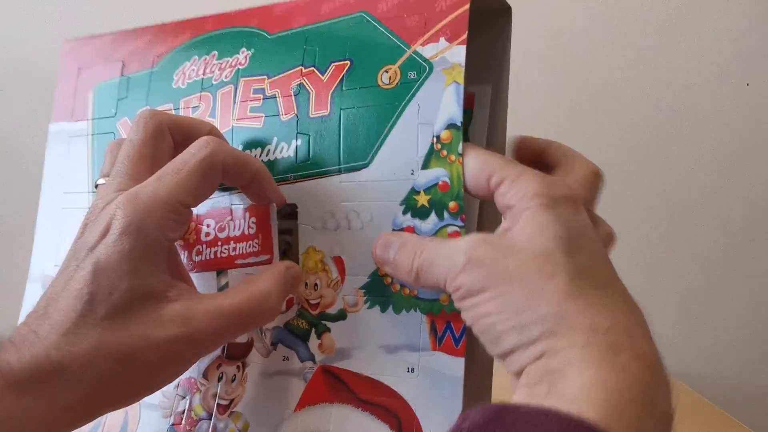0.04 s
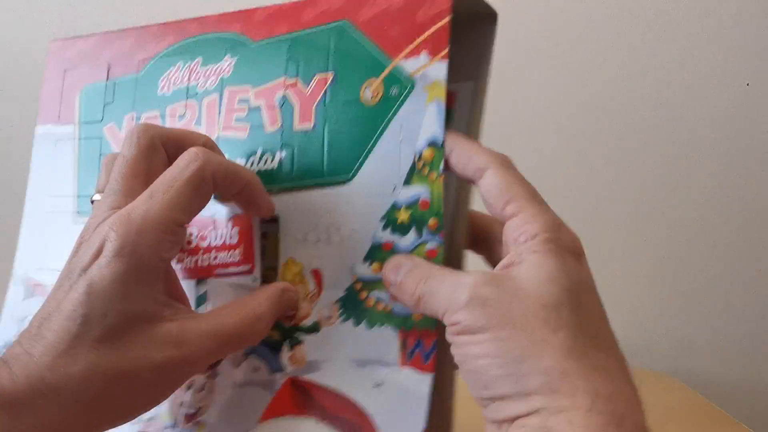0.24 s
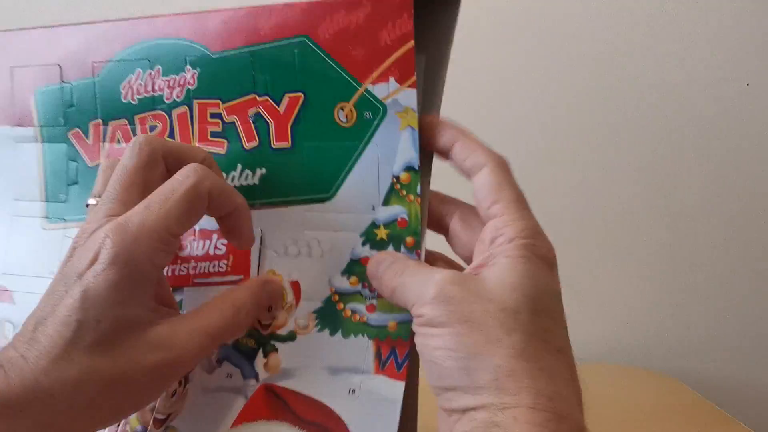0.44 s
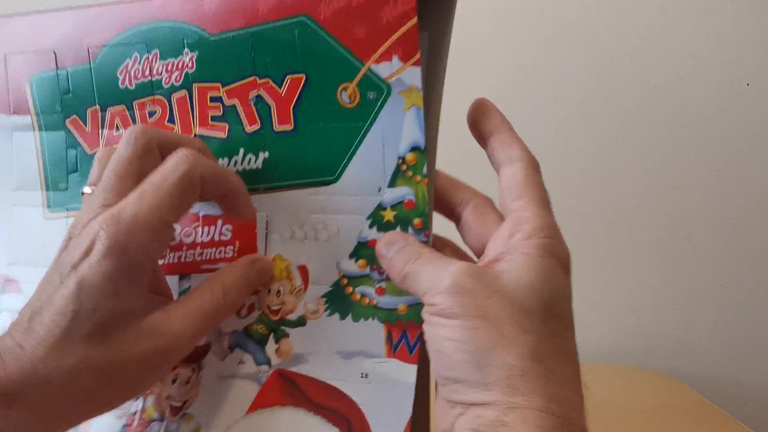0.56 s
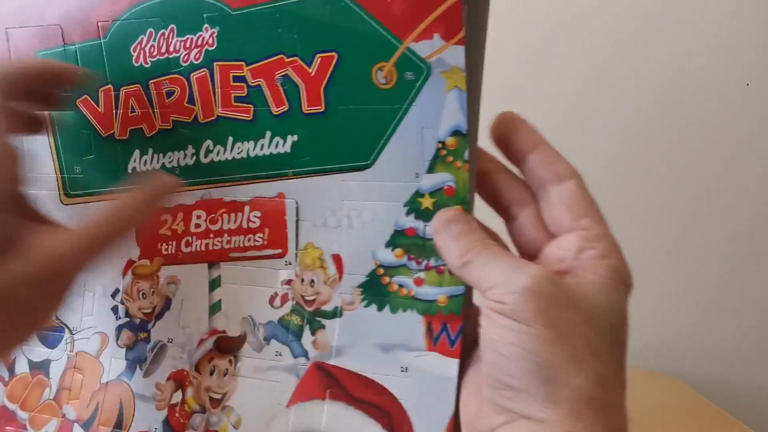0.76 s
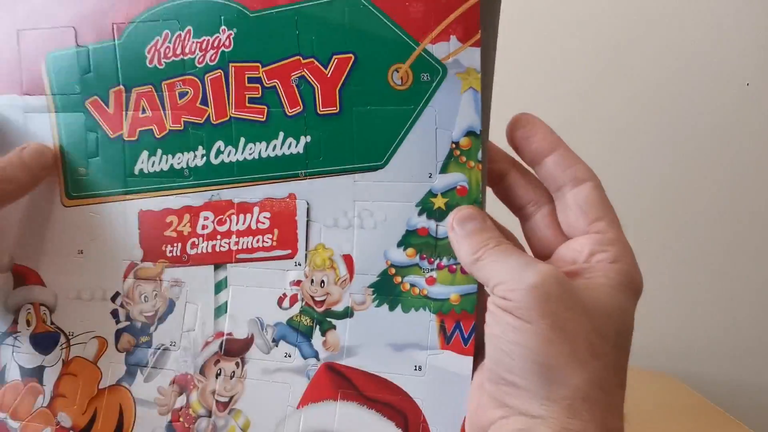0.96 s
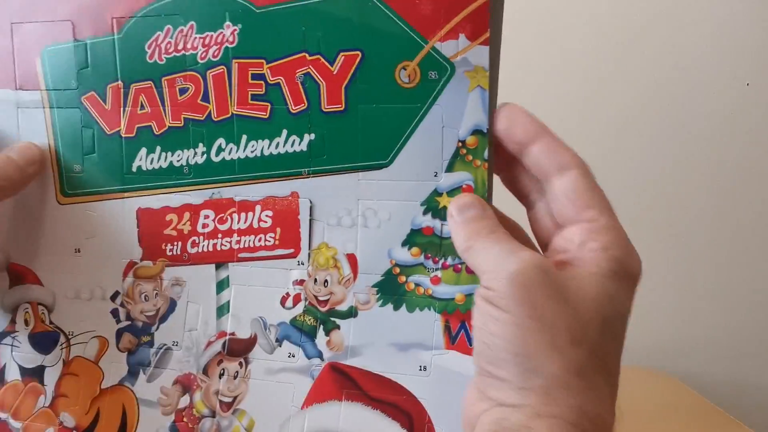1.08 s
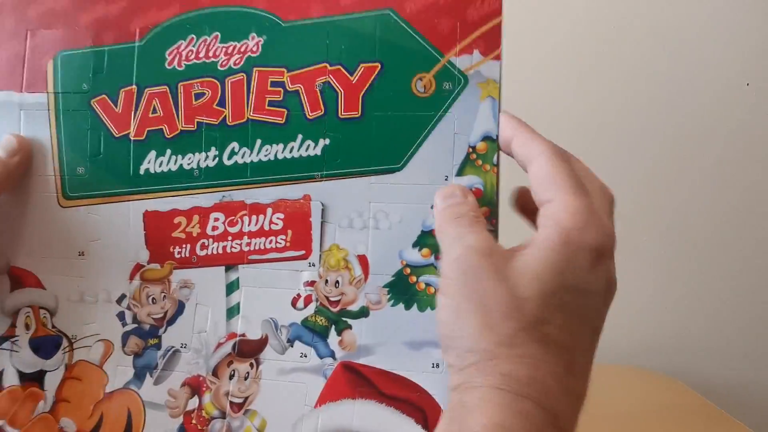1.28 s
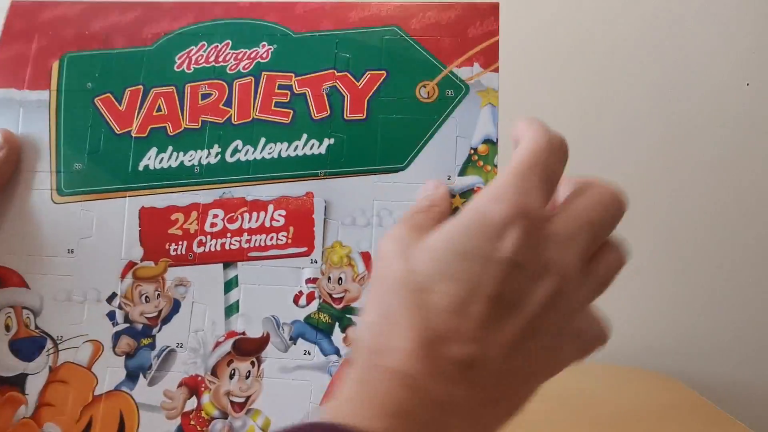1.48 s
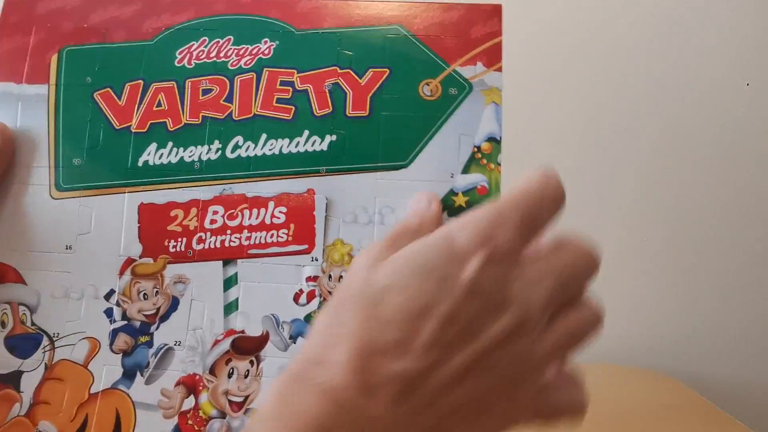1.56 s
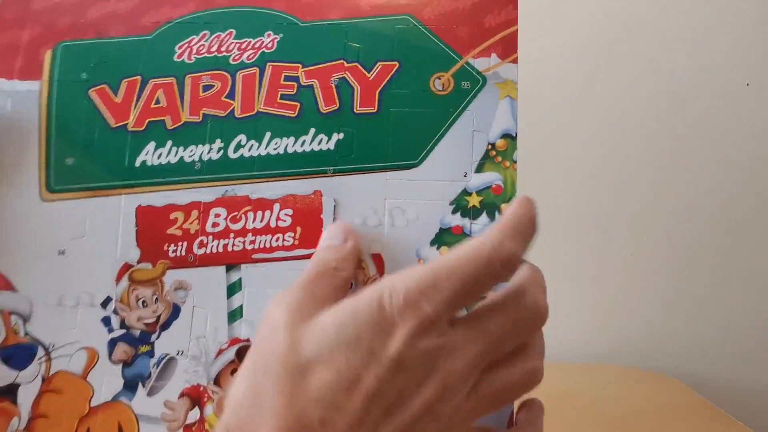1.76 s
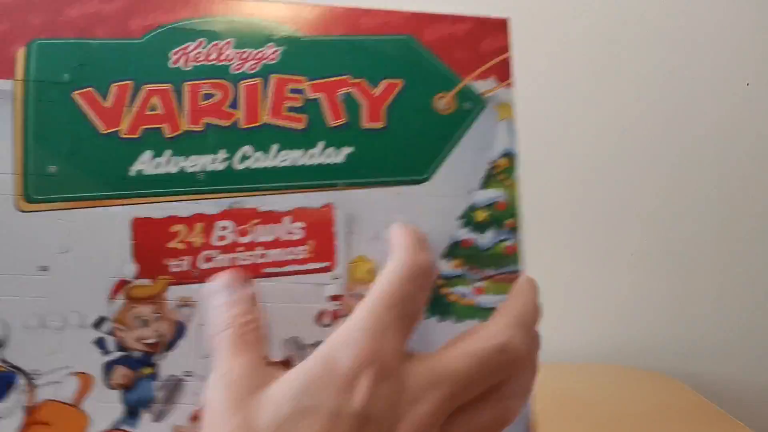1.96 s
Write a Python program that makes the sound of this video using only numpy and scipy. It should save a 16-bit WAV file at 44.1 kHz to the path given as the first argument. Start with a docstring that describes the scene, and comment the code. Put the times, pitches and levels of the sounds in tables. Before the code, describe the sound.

Fingers scrape at a cardboard flap, which cracks open and rings the large hollow box; then soft thuds, skin squeaks, short slides and low palm rubs, close to the microphone in a small quiet room.

```python
"""Small room, close to the microphone: fingers work at a window of a large hollow cardboard calendar box.
A nail scrapes along the flap; the flap snaps past its edge in quick noise steps and rings the box's modes.
The hands slide, tap and shift their grip: fibre slips through card responses, chatter, squeaks and thuds.
Flexing panels push slow puffs of air at the microphone, over quiet room noise."""
import sys
import numpy as np
from scipy import signal
from scipy.fft import rfft, irfft
from scipy.io import wavfile
from scipy.ndimage import uniform_filter1d

SR = 44100
rng = np.random.default_rng(int(sys.argv[2]) if len(sys.argv) > 2 else 0)


def int16_out(signal):
    """Quantize to a 16-bit WAV file."""
    q = np.round(np.clip(np.atleast_2d(signal).T, -1, 1) * 32767)
    wavfile.write(sys.argv[1], SR, q.astype(np.int16))


N = 89126
T = np.arange(N) / SR  # s
FREQ = np.maximum(np.fft.rfftfreq(2 * N, 1 / SR), 1)  # Hz
# skin or nail sliding on card, relative spectrum: freq_hz, gain_db
SLIDE_SPECTRUM = [(240, -17), (600, -16), (900, 9.5), (1500, 11.5), (2050, 6.5), (2400, 0), (3000, 6.5),
                  (3500, 12), (4600, -1), (5300, -14.5), (6500, -25), (9000, -35), (15000, -67)]


def undb(db):
    """Amplitude of a level in dB."""
    return 10 ** (np.asarray(db) / 20)


def unit(x):
    """Scale to rms 1."""
    return x / np.sqrt(np.mean(x ** 2))


def impulse(x):
    """Scale a response to energy 1."""
    return x / np.sqrt(np.sum(x ** 2))


def fade(t60_s):
    """Exponential decay, 60 dB in t60_s."""
    return np.exp(-np.log(1000) * T / max(t60_s, 1e-3))


def ease(u):
    """Smooth step from 0 to 1."""
    return np.sin(np.pi / 2 * np.clip(u, 0, 1)) ** 2


def conv(x, h):
    """Convolution cut to the scene's length."""
    return signal.fftconvolve(x, h)[:N]


def late(x, start_s):
    """The same sound, starting at start_s."""
    return np.concatenate([np.zeros(max(int(start_s * SR), 0)), x])[:N]


def response(gain):
    """Minimum-phase response of the given gain over FREQ, energy 1."""
    cepstrum = irfft(np.log(gain + 1e-6))
    # fold the cepstrum to its causal half
    cepstrum[1:N] *= 2
    cepstrum[N + 1:] = 0
    return impulse(irfft(np.exp(rfft(cepstrum)))[:N])


def colour(points):
    """Causal response through (freq_hz, gain_db) points, linear in dB over log frequency."""
    hz, db = np.array(points).T
    return response(undb(np.interp(np.log(FREQ), np.log(hz), db)))


def scatter(t60_s):
    """Dense reflections dying away, with an even spectrum."""
    spectrum = rfft(rng.standard_normal(N) * fade(t60_s))
    spectrum /= np.sqrt(uniform_filter1d(abs(spectrum) ** 2, size=300))
    return impulse(irfft(spectrum, N) * (T < 2 * t60_s + .01))


def stroke(start_s, attack_s, hold_s, release_s, level_db):
    """Pressure of one stroke: linear swell, hold, then 20 dB down per release_s."""
    u = T - start_s
    swell = np.clip(u / max(attack_s, .002), 0, 1)
    decay = 10 ** (-np.maximum(u - attack_s - hold_s, 0) / max(release_s, .002))
    return undb(level_db) * swell * decay


def fibres():
    """Dense slips of uneven size as a finger crosses paper fibres, catching and easing as it goes."""
    slips_per_s, catch_db, catch_hz = 3000, 2, 60
    slips = rng.random(N) < slips_per_s / SR
    catch = np.interp(T * catch_hz, np.arange(N), rng.standard_normal(N))
    return unit(slips * rng.standard_normal(N) * undb(catch_db * catch))


def rubbing(strokes, spectrum):
    """Fibre slips under the strokes, spread by waves in the panel and coloured by the card."""
    panel_db, panel_t60_s = -2, .036
    slips = fibres() * sum(stroke(*row) for row in strokes)
    waves = impulse(rng.standard_normal(N) * fade(panel_t60_s))
    panel = impulse(signal.unit_impulse(N) + undb(panel_db) * waves)
    return conv(slips, impulse(conv(panel, colour(spectrum))))


def flap():
    """The flap cracks over its edge in quick steps and rasps past it; the first step rings the box."""
    # catching and letting go: start_s, level_db
    snaps = [(0.4724, 1.5), (0.4793, 3), (0.4832, -3.5), (0.491, 0), (0.4989, -8)]
    # crack, relative spectrum: freq_hz, gain_db
    crack_spectrum = [(80, -28), (190, -8), (300, -4.5), (450, -3), (650, -12.5), (1100, -14.5), (1550, -6),
                      (2100, -18.5), (2400, -16.5), (3300, -28), (4150, -22), (4700, -52), (5900, -38),
                      (7200, -68), (10000, -76), (15000, -70)]
    # rasp past the window's edge: start_s, attack_s, hold_s, release_s, level_db
    rasp_strokes = [(.472, 0.002, 0.037, 0.066, -38)]
    # rasp, relative spectrum: freq_hz, gain_db
    rasp_spectrum = [(120, -28.5), (220, 7.5), (450, 0.5), (700, -0.5), (1000, 2.5), (1550, -3.5),
                     (2100, -13), (2400, -14), (3300, -16), (4150, -26), (4700, -35), (5900, -41),
                     (7200, -45), (15000, -71)]
    crack_db, crack_t60_s, tail_db, tail_t60_s, ring_db = -5, .012, -3.5, .21, 3
    soft_card_hz = 2440  # soft card dulls each step above this

    steps = 0
    for start_s, level_db in snaps:
        step = impulse(signal.unit_impulse(N) + 1.3 * scatter(crack_t60_s))
        steps = steps + undb(level_db) * late(step, start_s)
    steps = signal.sosfilt(signal.butter(1, soft_card_hz, fs=SR, output="sos"), steps)
    first_s = snaps[0][0]
    tail = late(scatter(tail_t60_s), first_s)
    card = conv(undb(crack_db) * steps + undb(tail_db) * tail, colour(crack_spectrum))
    ring = undb(ring_db) * late(box(), first_s)
    return card + rubbing(rasp_strokes, rasp_spectrum) + ring


def box():
    """Hollow-box ring: decaying modes that build up as the panels take up the blow."""
    # box modes: freq_hz, level_db (relative), t60_s
    modes = [(165, -17, .17), (214, -8, .2), (245, -9, .19), (296, -10, .18), (342, -7, .18), (404, -2, .2),
             (444, 3, .19), (545, -6, .26), (594, -3, .23), (657, -12, .17), (716, -8, .16),
             (1346, -4.5, .15), (1506, -4.5, .16), (1571, -10, .17), (1705, -6.5, .17), (1793, -8, .16)]
    rise_s = .0055  # time constant
    ring = 0
    for hz, level_db, t60_s in modes:
        ring = ring + undb(level_db) * fade(t60_s) * np.sin(2 * np.pi * (hz * T + rng.random()))
    return impulse(ring * (1 - np.exp(-T / rise_s)))


def taps():
    """Soft fingertips thud on the hollow box and ring it; a lower corner sounds softer and duller."""
    # fingers landing: start_s, level_db, corner_hz, t60_s
    landings = [(0.161, -23, 700, 0.3), (0.892, -22.5, 900, 0.82), (.903, -14.5, 158, 0.27),
                (0.924, -25, 452, 0.36), (0.952, -17, 526, 0.056), (1.092, -34, 760, 0.55),
                (1.451, -12.5, 320, 0.076), (1.468, -9.5, 293, 0.036), (1.480, -10, 266, 0.16),
                (1.602, -16, 191, 0.18), (1.618, -25, 222, 0.19), (1.692, -20.5, 236, 0.11),
                (1.773, -27, 159, 0.26)]
    low_hz, order, ring_db = 95, 3.4, -7
    thud_db, thud_t60_s = -10, .021
    out = 0
    for start_s, level_db, corner_hz, t60_s in landings:
        contact = response(1 / (1 + (FREQ / corner_hz) ** order) / (1 + (low_hz / FREQ) ** 2))
        thud = impulse(conv(scatter(t60_s) + undb(thud_db) * scatter(thud_t60_s), contact))
        ring = undb(ring_db) * impulse(conv(box(), contact))
        out = out + undb(level_db) * late(thud + ring, start_s)
    return out


def scratches():
    """A nail scrapes over card fibres."""
    # strokes: start_s, attack_s, hold_s, release_s, level_db
    strokes = [(.295, 0.027, 0.073, 0.096, -46.5), (.41, 0.021, 0.071, 0.017, -56.5)]
    # relative spectrum: freq_hz, gain_db
    spectrum = [(150, -27.5), (330, 2.5), (560, -20), (800, 3), (1080, -1), (1550, 2), (2150, -0.5),
                (2500, -8), (4100, -4.5), (4700, -23), (6000, -35), (9000, -55), (15000, -57)]
    return rubbing(strokes, spectrum)


def slides():
    """Bright slides over card fibres."""
    # strokes: start_s, attack_s, hold_s, release_s, level_db
    strokes = [(1.18, 0.043, 0.074, 0.086, -62.5), (1.31, 0.055, 0.03, 0.081, -50),
               (1.385, 0.075, 0.021, 0.059, -47.5)]
    return rubbing(strokes, SLIDE_SPECTRUM)


def brushes():
    """Faint brushing over card fibres."""
    # strokes: start_s, attack_s, hold_s, release_s, level_db
    strokes = [(.05, 0.034, 0.045, 0.55, -62.5), (.60, 0.077, 0.071, 0.033, -62),
               (.885, 0.013, 0.041, 0.035, -60), (1.755, 0.015, 0.204, 0.15, -60)]
    # relative spectrum: freq_hz, gain_db
    spectrum = [(240, -21), (450, -12), (720, 0), (950, -9.5), (1300, -1.5), (1800, -3), (2080, -11),
                (2800, -13), (3900, -11), (4700, -22), (7000, -31), (15000, -62)]
    return rubbing(strokes, spectrum)


def grips():
    """Dull rubs of fingers taking a new grip."""
    # strokes: start_s, attack_s, hold_s, release_s, level_db
    strokes = [(.16, 0.0037, 0.016, 0.059, -51.5), (.26, 0.043, 0.015, 0.022, -49.5),
               (.553, 0.027, 0.026, 0.014, -52), (.93, 0.013, 0.046, 0.035, -54.5),
               (1.084, 0.002, 0.025, 0.094, -59.5), (1.53, 0.035, 0.031, 0.035, -55)]
    # relative spectrum: freq_hz, gain_db
    spectrum = [(120, -17), (280, -1.5), (400, 4), (540, -4), (720, -17.5), (1500, -30.5), (5000, -74.5)]
    return rubbing(strokes, spectrum)


def palm():
    """The palm drags heavily on the box, low and dull."""
    # strokes: start_s, attack_s, hold_s, release_s, level_db
    strokes = [(1.598, 0.014, 0.021, 0.07, -37), (1.68, 0.014, 0.18, 0.12, -51)]
    # relative spectrum: freq_hz, gain_db
    spectrum = [(40, -5), (100, 4), (165, 0.5), (280, -6), (450, -10.5), (900, -34.5), (3000, -71)]
    return rubbing(strokes, spectrum)


def scuffs():
    """Short dry scuffs that stop as the finger lifts."""
    # strokes: start_s, attack_s, hold_s, release_s, level_db
    strokes = [(.515, 0.0019, 0.0069, 0.0069, -50.5), (1.497, .034, 0.018, 0.038, -49)]
    # relative spectrum: freq_hz, gain_db
    spectrum = [(300, -25), (800, 4.5), (1250, 10), (1700, 6), (2100, 4.5), (2600, -5.5), (3000, 7),
                (3500, 6), (4100, 5), (4400, -27.5), (5400, -7), (6500, -26.5), (15000, -68.5)]
    return rubbing(strokes, spectrum)


def drags():
    """A fingertip sticks and chatters: fibre slips through one narrow resonance per stroke."""
    # strokes: start_s, attack_s, hold_s, release_s, level_db, resonance_hz, half_width_hz
    chatters = [(0.161, .002, 0.016, 0.08, -54, 1090, 260), (0.953, 0.022, 0.031, 0.034, -57.5, 604, 90),
                (1.091, 0.002, 0.025, .07, -57.5, 640, 150), (.305, .012, .05, .03, -55, 710, 70),
                (0.393, 0.025, 0.03, .03, -51, 775, 70), (1.191, 0.015, 0.049, 0.099, -61.5, 1120, 133),
                (1.38, 0.022, 0.07, 0.05, -56, 1500, 70), (1.455, 0.025, 0.05, 0.045, -54.5, 850, 80),
                (1.81, 0.03, 0.05, 0.2, -61, 1250, 110), (1.79, .05, .03, .05, -64, 1730, 60),
                (1.79, .05, .15, .08, -65.5, 2080, 90), (1.877, 0.024, 0.078, 0.026, -61.5, 715, 70),
                (1.80, 0.17, 0.044, 0.061, -61, 3850, 240)]
    out = 0
    for *shape, hz, half_width_hz in chatters:
        resonance = response(1 / (1 + ((FREQ - hz) / half_width_hz) ** 2))
        out = out + conv(fibres() * stroke(*shape), resonance)
    return out


def squeaks():
    """Skin sticks and slips on the glossy print: a rough tone that glides with the finger's speed."""
    # strokes: start_s, attack_s, hold_s, release_s, level_db, pitch_hz, glide_hz_per_s
    glides = [(0.581, 0.016, 0.067, .03, -64, 926, 501), (.668, 0.017, 0.07, 0.028, -55.5, 958, 207),
              (0.672, 0.015, .025, 0.071, -55, 882, -60), (1.296, 0.034, 0.055, 0.025, -55, 1624, -1700),
              (1.323, 0.023, .012, 0.032, -53, 3580, -900)]
    half_width_hz, roughness = 32, .6
    blur = response(1 / (1 + (FREQ / half_width_hz) ** 2))
    out = 0
    for start_s, attack_s, hold_s, release_s, level_db, hz, glide in glides:
        pitch_hz = hz + glide * np.clip(T - start_s, 0, attack_s + hold_s + release_s)
        wobble = conv(rng.standard_normal(N), blur) + 1j * conv(rng.standard_normal(N), blur)
        carrier = np.exp(2j * np.pi * np.cumsum(pitch_hz) / SR)
        tone = np.real((1 + roughness * wobble) * carrier)
        out = out + unit(tone) * stroke(start_s, attack_s, hold_s, release_s, level_db)
    return out


def ticks():
    """A fingernail ticks on the edge: short scatter with the slides' spectrum."""
    # ticks: start_s, level_db
    clicks = [(0.4689, -16.5), (1.446, -16), (1.455, -22.5), (1.47, -23.5)]
    t60_s = .025
    out = sum(undb(level_db) * late(scatter(t60_s), start_s) for start_s, level_db in clicks)
    return conv(out, colour(SLIDE_SPECTRUM))


def panels():
    """Each flex is one push of air with a rebound either side, over slow squeezes and the box's sway."""
    # panel flexes: centre_s, pressure_db, half_width_s, direction (1 out, -1 in)
    flexes = [(.901, -24, .0055, -1), (.924, -32, .0058, 1), (.959, -26, .0085, 1), (1.026, -32, .012, -1),
              (1.092, -28, .008, 1), (1.13, -24.5, .028, 1), (1.606, -22.5, .004, 1),
              (1.641, -20, .0075, 1), (1.682, -27, .008, 1), (1.728, -29, .009, 1), (1.753, -26, .006, 1),
              (1.787, -18, .0095, 1), (1.822, -27, .01, 1), (1.875, -19.5, .012, 1), (1.961, -29, .017, 1)]
    # hands squeezing and letting go: start_s, attack_s, hold_s, release_s, pressure_db
    squeezes = [(0.041, 0.033, 0.051, 0.044, -32), (0.137, 0.061, 0.057, 0.023, -31),
                (0.306, .13, 0.13, 0.048, -27.5), (0.586, 0.1976, 0.0011, 0.063, -24),
                (1.49, 0.019, 0.041, 0.18, -20)]
    # sway of the held box: time_s, level_db
    sway_levels = [(0, -49), (.3, -42), (.6, -46), (.8, -49), (.85, -54), (.93, -39), (1.02, -46),
                   (1.14, -43), (1.2, -51), (1.42, -52), (1.47, -41), (1.62, -33), (1.85, -36), (2.02, -45)]
    # sway, relative spectrum: freq_hz, gain_db
    sway_spectrum = [(3, -11), (12, -6.5), (24, -12.5), (45, -20), (90, -28), (180, -40), (400, -55.5),
                     (1000, -100), (4000, -120)]
    rebound = .81  # swing back after a flex

    sway_db = np.interp(T, *np.array(sway_levels).T)
    out = conv(rng.standard_normal(N), colour(sway_spectrum)) * undb(sway_db)
    for start_s, attack_s, hold_s, release_s, pressure_db in squeezes:
        press = ease((T - start_s) / attack_s)
        let_go = ease((T - start_s - attack_s - hold_s) / release_s)
        out = out + undb(pressure_db) * press * (1 - let_go)
    for centre_s, pressure_db, half_width_s, direction in flexes:
        u = (T - centre_s) / half_width_s
        push = (1 - rebound * u ** 2) * np.exp(-u ** 2 / 2)
        out = out + np.sign(direction) * undb(pressure_db) * push
    return out


def room_tail(x):
    """Diffuse reflections of the small room."""
    tail_db, t60_s, delay_s = -17.5, .2, .0033
    return undb(tail_db) * conv(x, late(scatter(t60_s), delay_s))


def room_noise():
    """Steady coloured noise of the quiet room."""
    # relative spectrum: freq_hz, gain_db
    spectrum = [(40, -18.5), (157, -29.5), (400, -28.5), (700, -31.5), (1600, -35), (3400, -38.5),
                (4600, -40), (6000, -43.5), (7600, -49), (8400, -56), (12000, -60.5), (15000, -69)]
    level_db = -61
    return undb(level_db) * unit(conv(rng.standard_normal(N), colour(spectrum)))


def scene():
    """Flap, taps and panels, rubs with a short room tail, and quiet room noise."""
    rubs = scratches() + slides() + brushes() + grips() + palm() + scuffs()
    rubs = rubs + drags() + squeaks() + ticks()
    return (flap() + taps() + rubs + room_tail(rubs) + panels() + room_noise())[None]


def record(dry):
    """The recorder cuts the top: steep elliptic low-pass."""
    top_hz = 15000
    return signal.sosfilt(signal.ellip(8, .2, 70, top_hz, fs=SR, output="sos"), dry)


dry = scene()
out = record(dry)
int16_out(out)
```